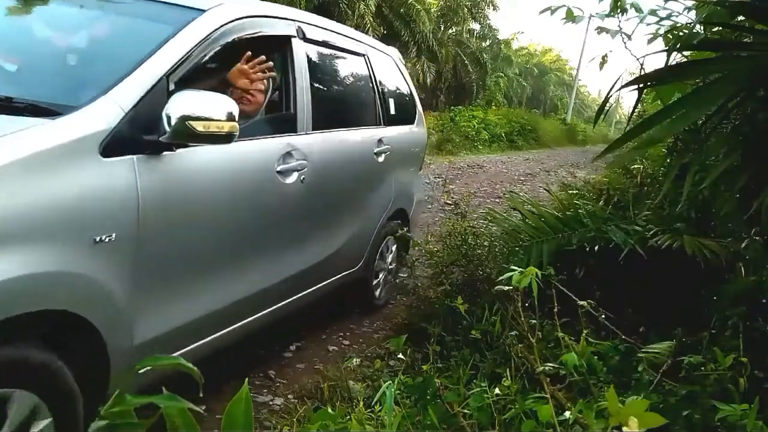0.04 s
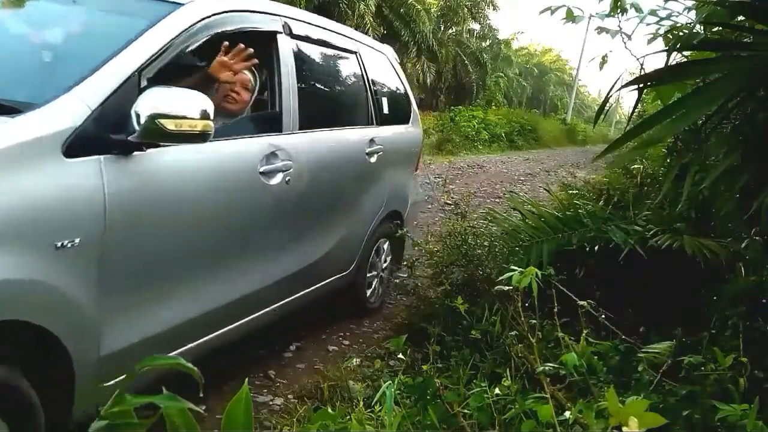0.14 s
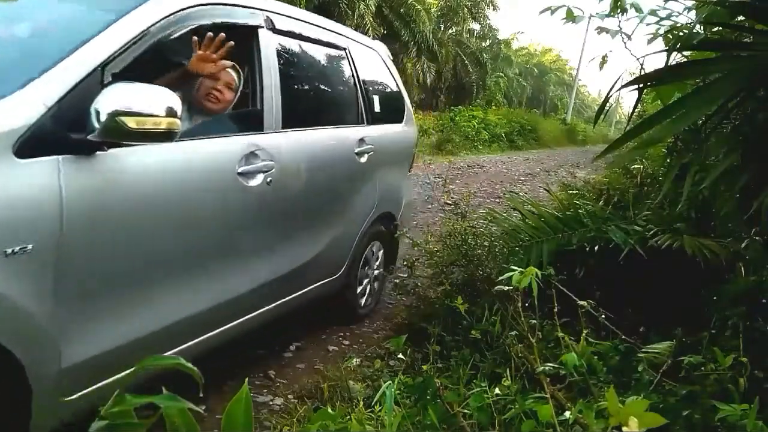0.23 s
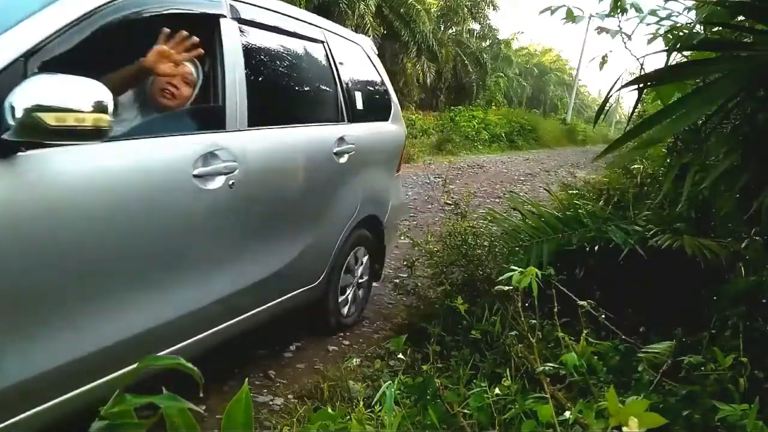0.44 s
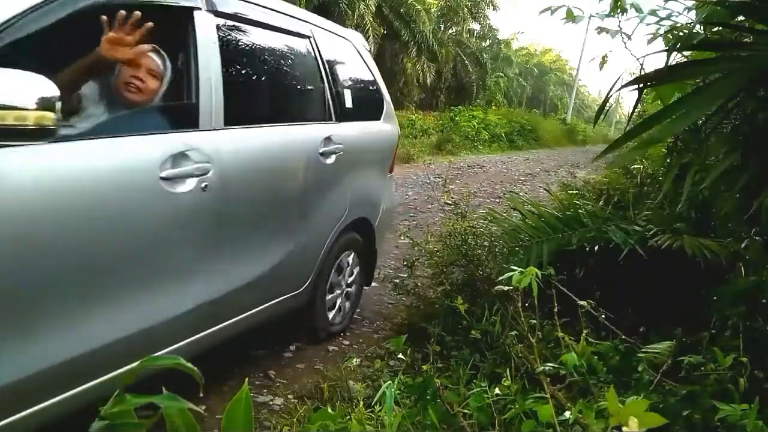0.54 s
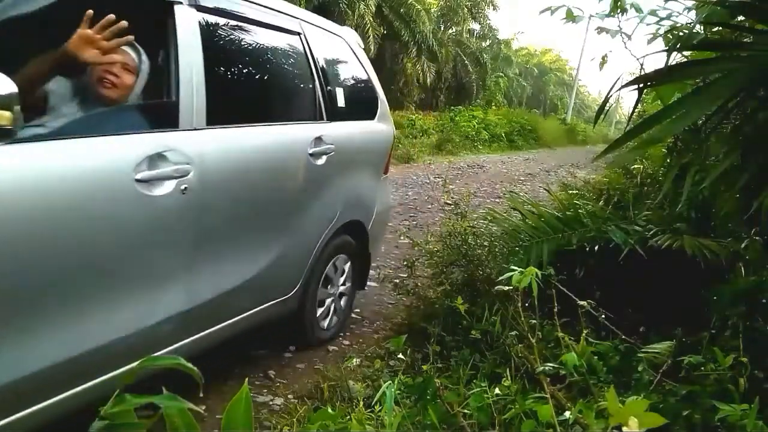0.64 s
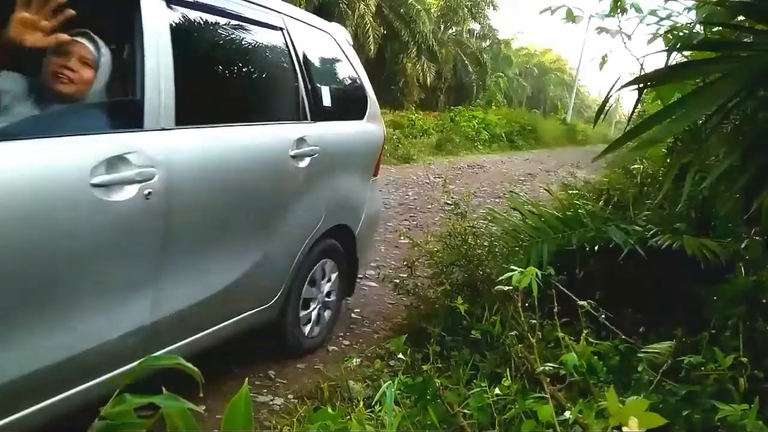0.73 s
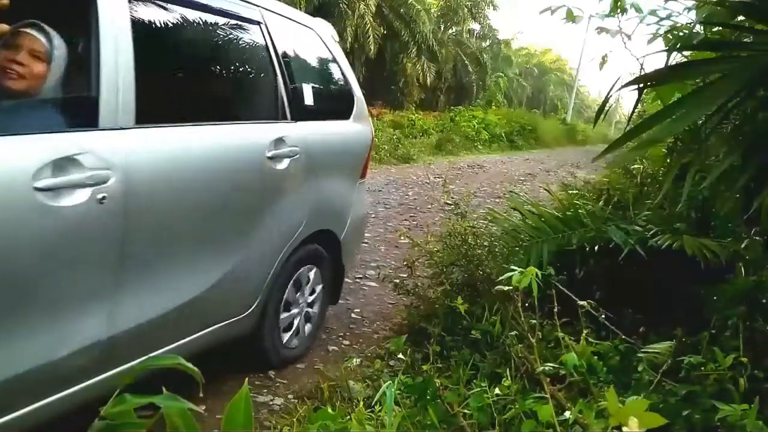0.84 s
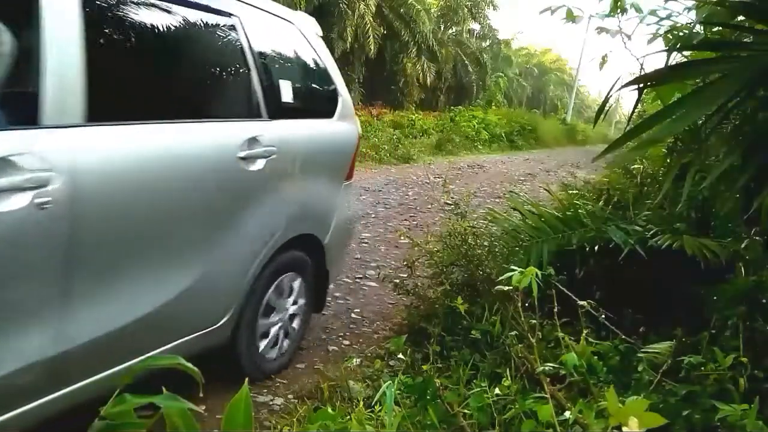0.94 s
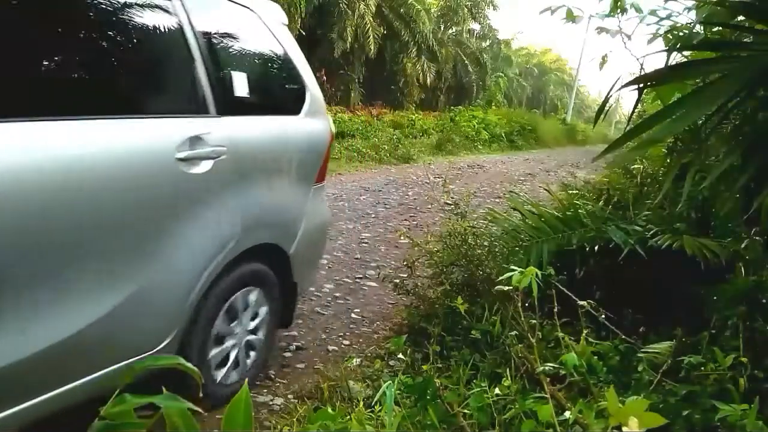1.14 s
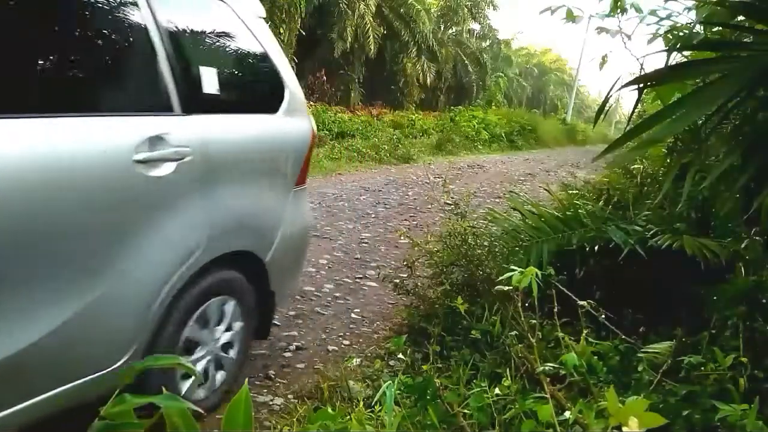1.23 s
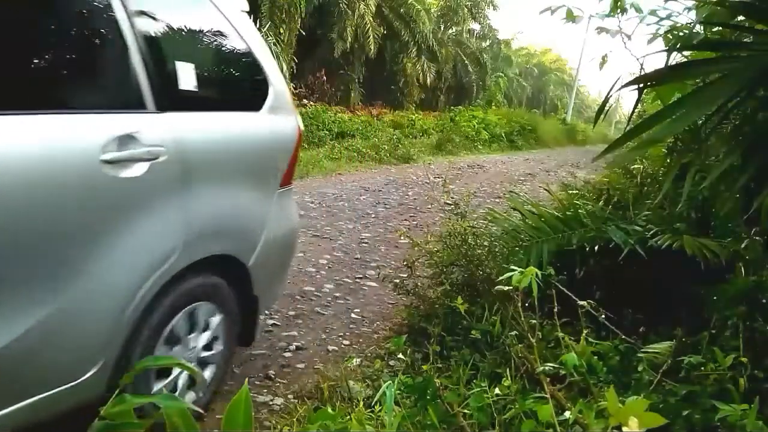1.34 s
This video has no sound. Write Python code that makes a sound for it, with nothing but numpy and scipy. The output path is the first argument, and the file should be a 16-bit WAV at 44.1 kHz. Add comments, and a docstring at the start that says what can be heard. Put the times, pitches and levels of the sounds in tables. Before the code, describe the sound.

A car horn toots three times close by, two quick and one longer, on a gravel track

```python
"""Three horn toots on a gravel track

A small car's disc horn toots three times close by as the car rolls off along a gravel track.
Its diaphragm swings up, hammers the core and rings a tone disc: a hum plus wavering partials and rasp.
Trees echo it as scattered taps; stones pop as short damped tones with a noisy tail.
Wind puffs, tyre noise and a faint engine hum lie underneath, and loud peaks clip at the input."""
import sys
import numpy as np
from scipy import signal
from scipy.fft import rfft, irfft
from scipy.io import wavfile

SR = 44100
rng = np.random.default_rng(int(sys.argv[2]) if len(sys.argv) > 2 else 0)


def magnitude_from_level(level_db):
    """Linear magnitude for a level in decibels (20 dB per decade)."""
    exponent = np.asarray(level_db, float) / 20
    return 10 ** exponent


def unload_audio(sound):
    """Save the sound as a 16-bit wav file, at the path given as the first command line argument."""
    columns = np.transpose(np.atleast_2d(sound))
    # keep every value between -1 and 1, then stretch to whole-number steps
    steps = np.round(np.clip(columns, -1, 1) * 32767)
    wavfile.write(sys.argv[1], SR, steps.astype(np.int16))


N = 61739
T = np.arange(N) / SR  # time in s


def evened(x):
    """Scales a signal to an rms of 1."""
    return x / np.sqrt(np.mean(abs(x) ** 2) + 1e-20)


def read(points, hz):
    """Reads a curve between its points, along a logarithmic frequency axis."""
    f, value = np.transpose(points)
    return np.interp(np.log(hz + 1), np.log(f + 1), value)


def low(x, hz):
    """Keeps what lies below a corner frequency."""
    return signal.sosfilt(signal.butter(2, hz, fs=SR, output="sos"), x)


def drift(per_s, count):
    """Slow random complex signals of rms 1, each a sum of twelve slow rotations."""
    f = per_s * rng.standard_normal((count, 12, 1))
    turn = rng.random((count, 12, 1))
    coarse = np.arange(0, N + 64, 64) / SR
    z = np.exp(2j * np.pi * (f * coarse + turn)).sum(1) / np.sqrt(12)
    return [np.interp(T, coarse, v.real) + 1j * np.interp(T, coarse, v.imag) for v in z]


def coloured(points):
    """Two channels of noise with a given spectrum, at an rms of 1."""
    hz = np.fft.rfftfreq(N + 1, 1 / SR)
    spectrum = rfft(rng.standard_normal((2, N + 1))) * magnitude_from_level(read(points, hz))
    return evened(irfft(spectrum, N + 1)[:, :N])


def held(t60, start, stop):
    """Quick rise, hold, exponential ring-out."""
    rise_s = 0.0025
    return np.clip((T - start) / rise_s, 0, 1) * magnitude_from_level(-60 * np.maximum(T - stop, 0) / t60)


# The toots: (first hammer blow t/s, release t/s, hum level/dB, hum level/dB once the blows stop,
# sizzle level/dB)
TOOTS = [(0.2254, 0.315, -28.5, -23.5, -12), (0.429, 0.547, -24.5, -20.5, -10.5),
         (0.741, 1.056, -16.5, -25.5, -9)]
BLOW_S, RELEASE_S, HUM_DB, FREE_HUM_DB, SIZZLE_DB = np.transpose(TOOTS)


def tooting(t60, levels_db, late_s=0):
    """The rise, hold and ring-out of all toots, each at its own level."""
    return sum(magnitude_from_level(db) * held(t60, a, b + late_s) for a, b, db in zip(BLOW_S, RELEASE_S, levels_db))


def unevenness():
    """Humps around the start and end of each toot, where the blows are uneven."""
    settle_s = 0.021
    starts = sum(np.exp(-((T - a) / settle_s) ** 2) for a in BLOW_S)
    stops = sum(np.exp(-((T - b - settle_s / 2) / settle_s) ** 2) for b in RELEASE_S)
    return starts + stops


# Hammering pitch of each toot: (f/Hz)
PITCHES_HZ = [417.4, 417.9, 419.2]


def hammering():
    """Turns of the hammering cycle so far; the pitch wanders more at both ends of a toot."""
    jitter, loose = 0.0003, 0.0045  # rms share of the pitch: always, extra at the ends
    wander = evened(low(rng.standard_normal(N), 81))
    pitch = np.interp(T, BLOW_S, PITCHES_HZ)
    return np.cumsum(pitch * (1 + (jitter + loose * unevenness()) * wander)) / SR


# Partials of the blows: (multiple of the pitch, level/dB); the first row is left to the hum
PARTIALS = [(1, -6), (2, -22), (3, -27), (4, -25), (5, -23), (6, -19), (7, -3), (8, -18), (9, -15),
            (10, -22), (11, -17), (12, -18), (13, -22), (14, -21), (15, -22), (16, -21), (17, -18),
            (18, -16), (19, -7), (20, -8), (21, -8), (22, -7), (23, -3), (24, -2), (25, -5), (26, -1),
            (27, -3), (28, -6), (29, -11), (30, -12), (31, -16), (32, -18), (33, -20), (34, -18), (35, -19),
            (36, -18), (37, -17)]
# Ring-out of the disc after release: (f/Hz, time to fall 60 dB t/s)
RING_T60 = [(800, 0.2), (3000, 0.22), (4500, 0.24), (6000, 0.23), (10000, 0.21), (15000, 0.25)]
# The disc's main tone, one list per toot: (t/s, level/dB, left-right level/dB)
RING = [
    [(0.23, -8.5, -8.5), (0.254, -7, 2), (0.316, -13, -4), (0.36, -38.5, 18)],
    [(0.435, -14.5, 0), (0.541, -9, 4.5), (0.565, -26, 1), (0.595, -22.5, 13), (0.62, -28, 4)],
    [(0.745, -18.5, -3), (0.835, -20.5, 16.5), (0.875, -24.5, 3.5), (0.901, -14.5, 6), (0.945, -22, 15.5),
     (0.971, -20, -11), (1.045, -13, 9), (1.1, -36, -1.5)],
]
# How the car body shades the horn: (f/Hz, level/dB)
BEAM = [(800, -13.5), (2500, 0), (5000, -1.84), (8000, -0.3), (11000, 0.1), (15000, 0)]
# Balance of the partials between the two ports: (f/Hz, left-right level/dB)
LEAN = [(2900, 2.5), (4000, -1.5), (5600, -1.5), (8000, -0.5), (13000, -1)]
# Quick shake of each partial: (f/Hz, depth)
FLUTTER = [(800, 1.3), (1700, 1.3), (2500, .45), (3500, .35), (6000, .3), (10000, .45), (15000, .45)]
# How far the neighbours of the main tone ride on its resonance, per toot: (level/dB)
NEAR_DB = [-13, -10, -18]
# Level change by a high disc mode near 11 kHz, less as the car turns away, per toot: (level/dB)
SHINE_DB = [3, 3, -0.5]


def disc():
    """Hammer blows ring a disc in exact multiples of their pitch; moving reflections make them waver."""
    steady = 0.4  # steady share of the power in the shifting reflections
    ring_waver = 0.27  # waver of the main tone against its steady part
    out, turns = np.zeros((2, N)), hammering()
    ring_s, ring_db, ring_pan_db = np.transpose(sum(map(list, RING), []))
    wavers = drift(8, count=2 * len(PARTIALS))
    shakes = drift(40, count=2 * len(PARTIALS))
    for i, (k, db) in enumerate(PARTIALS[1:]):
        hz = k * 419.1  # nominal pitch, for reading the curves
        tone, t60 = np.exp(2j * np.pi * k * turns), read(RING_T60, hz)
        for ear, side in enumerate((1, -1)):
            waver, shake = wavers[2 * i + ear], shakes[2 * i + ear]
            level = magnitude_from_level(db + read(BEAM, hz) + side * read(LEAN, hz) / 2) * tooting(t60, SIZZLE_DB)
            path = np.sqrt(steady) * np.exp(2j * np.pi * rng.random()) + np.sqrt(1 - steady) * waver
            if k in (6, 8):  # neighbours of the main tone
                level = level + magnitude_from_level(np.interp(T, ring_s, ring_db)) * tooting(t60, NEAR_DB)
            if k in (26, 27):  # the high mode's two partials
                level = magnitude_from_level(db) * tooting(t60, SIZZLE_DB + SHINE_DB)
                path = np.exp(2j * np.pi * rng.random()) + 2 * ring_waver * waver
            if k == 7:  # the disc's main tone, held a little past release
                level = magnitude_from_level(np.interp(T, ring_s, ring_db + side * ring_pan_db / 2))
                level = level * tooting(t60, [0, 0, 0], late_s=0.026)
                path = np.sqrt(2) * (np.exp(.5j * side) + ring_waver * waver)
            out[ear] += (level * (path + read(FLUTTER, hz) * shake) * tone).real
    return out


# Spectrum of the rasp: (f/Hz, level/dB per Hz)
RASP = [(300, -22), (900, -13.5), (1700, -13), (3000, -21), (6000, -28), (8000, -19), (10500, 0),
        (12500, -9), (13500, -18), (15400, -16)]


def rasp():
    """Noise between the partials, stronger where the blows are uneven and going on into the ring-out."""
    steady_db, ends_db, tail_db = -22, -8, -13
    body = tooting(0.3, SIZZLE_DB)
    freed = sum(magnitude_from_level(db) * held(0.24, b, b) for b, db in zip(RELEASE_S, SIZZLE_DB))
    level = body * (magnitude_from_level(steady_db) + magnitude_from_level(ends_db) * unevenness()) + magnitude_from_level(tail_db) * freed
    return level * coloured(RASP)


def low_noise():
    """A soft low rumble under each toot, rising and fading with it: noise filtered low twice."""
    noise = evened(low(low(rng.standard_normal((2, N)), 120), 240))
    return magnitude_from_level(-38.5) * tooting(0.3, SIZZLE_DB) * noise


# Overshoot of the hum at the first blow, per toot: (level/dB)
HUM_KICK_DB = [12.5, 7.5, 1]


def hum():
    """The diaphragm's own swing: it starts before the blows, droops, and once freed sags then rises."""
    droop_db_per_s, hold_s, t60 = -16.5, 0.034, 0.14
    pitch_hz, sag_hz, free_hz = 419.1, 396.7, 450.4
    side = np.array([[.5], [-.5]])
    pan = magnitude_from_level(5 * side) * np.sqrt(2)  # left louder by 5 dB
    out = np.zeros((2, N))
    sways = drift(4.9, count=len(TOOTS))
    for (start, stop, hum_db, free_db, _), sway, kick_db in zip(TOOTS, sways, HUM_KICK_DB):
        free = np.clip((T - stop) / 0.005, 0, 1)
        kick = kick_db * np.exp(-abs(T - start - .004) / 0.011)
        driven_db = hum_db + kick + droop_db_per_s * np.maximum(T - start, 0)
        db = (1 - free) * driven_db + free * free_db
        db = db - 60 * np.maximum(T - stop - hold_s, 0) / t60
        hz = np.interp(T - stop, [-.01, .012, .07], [pitch_hz, sag_hz, free_hz])
        rise = np.clip((T - start) / 0.013 + .8, 0, 1) ** 1.2  # begins 10 ms before the blow
        phase = 2 * np.pi * np.cumsum(hz) / SR + 0.9 * side  # left leads by 0.9 rad
        out += (rise * magnitude_from_level(db) * (1 + .2 * sway) * np.exp(1j * phase)).real * pan
    return out


# Tones of the horn's mount: (f/Hz, level/dB)
BRACKET = [(678.3, -42.5), (899.0, -44), (1400, -66.5), (1572, -46.5), (1798, -61.5), (2105, -53.5)]
# Added to all the mount's tones, per toot: (level/dB)
BRACKET_DB = [8.5, 12.5, -12.5]


def mount():
    """The horn's mount rings in several fluctuating tones once each toot is released."""
    out = np.zeros((2, N))
    for stop, toot_db in zip(RELEASE_S, BRACKET_DB):
        shape = np.clip((T - stop) / 0.005, 0, 1) * held(0.45, stop, stop)
        for hz, db in BRACKET:
            ring = (np.exp(2j * np.pi * hz * T) * np.array(drift(14, count=2))).real
            out += magnitude_from_level(db + toot_db) * shape * ring
    return out


def trees(x):
    """Scattered echoes from trunks and bushes: sparse random taps that die away."""
    t60, level_db = 0.32, -17
    t = np.arange(SR // 2) / SR
    sparse = rng.standard_normal((2, len(t))) * (rng.random((2, len(t))) < .05)
    taps = sparse * magnitude_from_level(-60 * t / t60) * (t > .008)
    return magnitude_from_level(level_db) * signal.fftconvolve(x, taps / np.linalg.norm(taps[0]), axes=1)[:, :N]


# Popping stones: (t/s, level/dB before the band filter, f/Hz, left-right level/dB)
POPS = [(.004, -31, 640, 14.5), (.13, -40, 490, 6), (0.5593, -6.5, 1159, 19.5), (0.676, -25.5, 720, 13.5),
        (.757, -23.5, 221, 2), (1.118, -33, 690, -11), (1.136, -16.5, 1770, 2)]


def stones():
    """Single stones pop under the tyres: a damped tone with a noisy tail, kept to a band around it."""
    width, tail_db, tail_s = 0.39, -7, 0.007  # width of the resonance as a share of its frequency
    out, u = np.zeros((2, N)), np.arange(1300) / SR
    for s, db, hz, pan_db in POPS:
        tone = np.exp(-np.pi * width * hz * u) * np.sin(2 * np.pi * hz * u)
        tail = magnitude_from_level(tail_db) * np.exp(-u / tail_s) * rng.standard_normal((2, len(u)))
        band = signal.butter(3, hz * np.array((.35, 1.55)), "band", fs=SR, output="sos")
        pan = np.array([[pan_db / 2], [-pan_db / 2]])
        out[:, round(s * SR):][:, :len(u)] += magnitude_from_level(db + pan) * signal.sosfilt(band, tone + tail)
    return out


# Puffs of wind at the ports: (t/s, fade t/s, level/dB)
GUSTS = [(1.224, 0.043, -34), (1.242, 0.025, -51.5), (1.377, .04, -44.5)]


def wind():
    """Short low puffs of noise, half shared by the two ports."""
    z = rng.standard_normal((3, N))
    blow = np.zeros(N)
    for s, fade_s, db in GUSTS:
        blow += magnitude_from_level(db) * np.clip((T - s) / 0.012, 0, 1) * np.exp(-np.maximum(T - s, 0) / fade_s)
    return blow * evened(low(z[:2] + z[2], 185.4))


# Spectrum of the tyre noise and outdoor air: (f/Hz, level/dB per Hz)
FLOOR = [(25, -11.5), (60, -14), (95, -11), (200, -12.5), (550, -6), (1000, -12.5), (1600, -17.5),
         (3500, -18), (9500, -17.5), (13500, -18.5), (15400, -59)]
# Swell of the tyre noise: (t/s, level/dB)
CRUNCH = [(0, 4.5), (.06, -16), (.18, -11), (.22, 7.5), (.6, -1.5), (.72, 9), (1.15, 1.5), (1.3, -5.5),
          (1.4, -10.5)]


def tyres_and_air():
    """Lumpy tyre noise in the lows; the treble of the outdoor air stays even."""
    lump_db, air_db, level_db = 2, -12, -43.5
    lumps = magnitude_from_level(lump_db * np.real(drift(18, count=1)[0]) + np.interp(T, *np.transpose(CRUNCH)))
    noise = coloured(FLOOR)
    rolling = low(noise, 1600)
    return magnitude_from_level(level_db) * (lumps * rolling + magnitude_from_level(air_db) * (noise - rolling))


def engine():
    """A faint engine hum: one low tone with random sway."""
    sway = 1 + np.array(drift(12, count=2))
    return magnitude_from_level(-63) * (np.exp(2j * np.pi * 93 * T) * sway).real


def scene():
    """The horn and its echoes over gravel, engine and wind."""
    toots = disc() + rasp() + low_noise() + hum() + mount()
    return toots + trees(toots) + tyres_and_air() + engine() + stones() + wind()


def low_pass(x):
    """Removes everything above the highest recorded frequency."""
    return signal.sosfilt(signal.butter(12, 15540, fs=SR, output="sos"), x)


def record(dry):
    """The input stage is driven 2 dB up and clips its peaks, then the band is limited."""
    hot = np.clip(dry * magnitude_from_level(2), -1, 1)
    edge = signal.firwin(511, 15620, window=("kaiser", 8), fs=SR)
    mix = signal.oaconvolve(hot, edge[None], "same")
    return low_pass(mix)


dry = scene()
out = record(dry)
unload_audio(out)
```